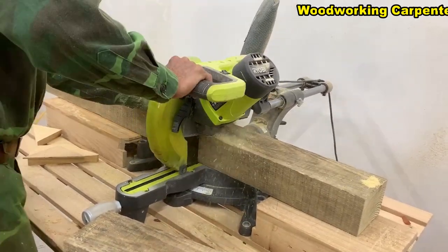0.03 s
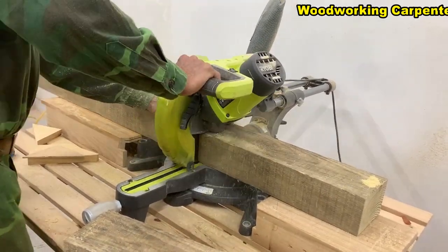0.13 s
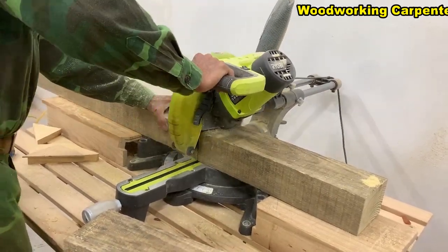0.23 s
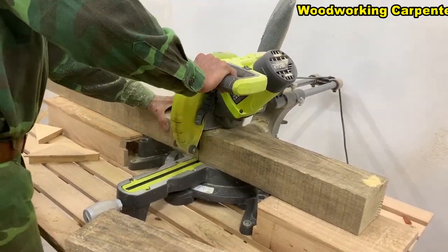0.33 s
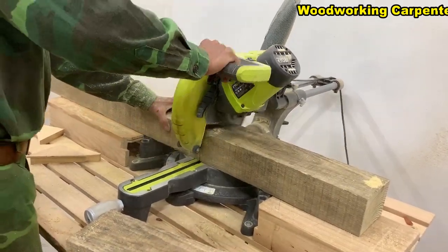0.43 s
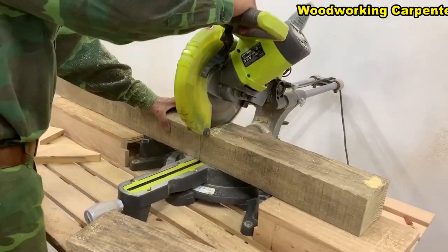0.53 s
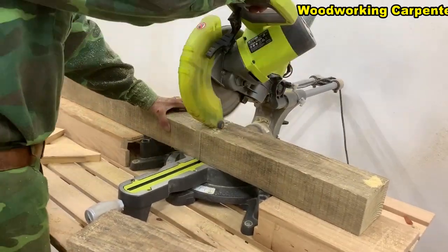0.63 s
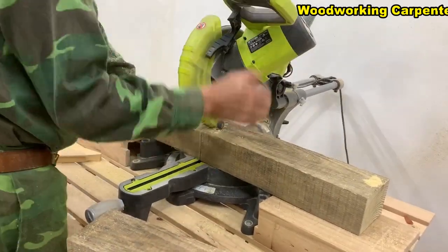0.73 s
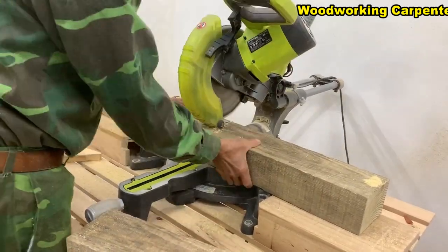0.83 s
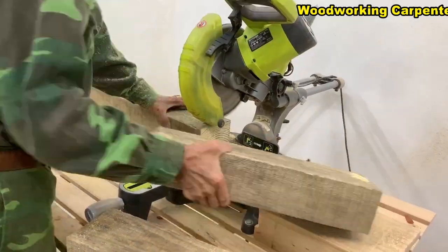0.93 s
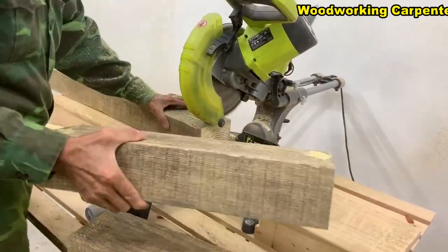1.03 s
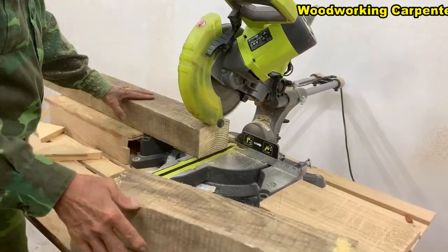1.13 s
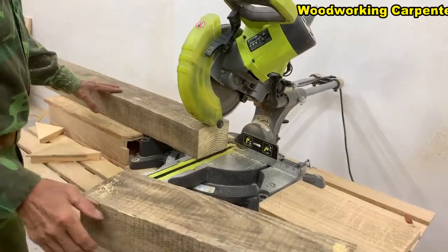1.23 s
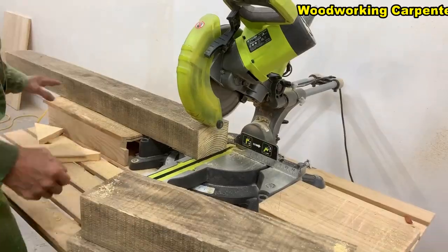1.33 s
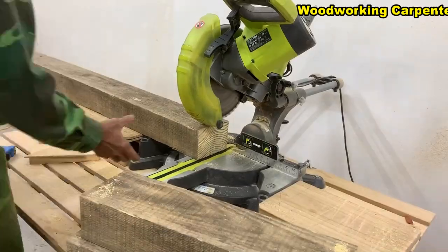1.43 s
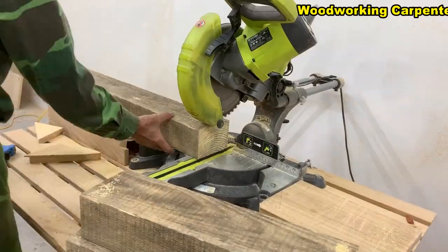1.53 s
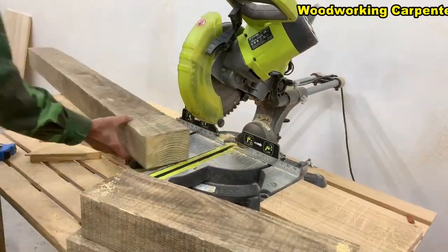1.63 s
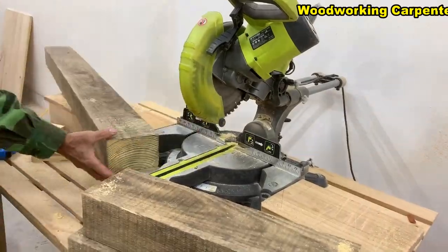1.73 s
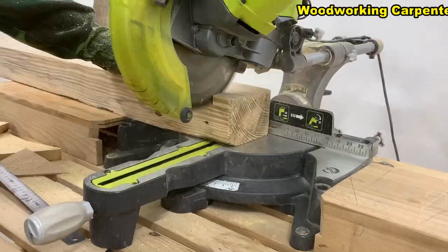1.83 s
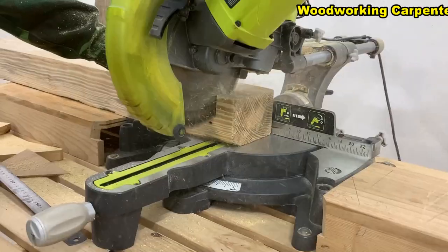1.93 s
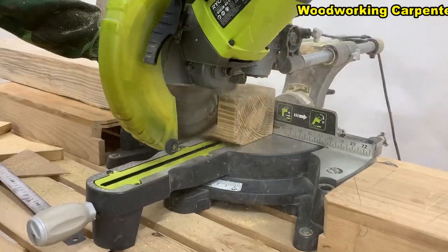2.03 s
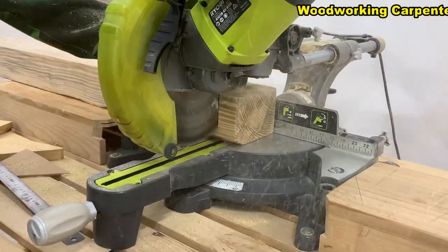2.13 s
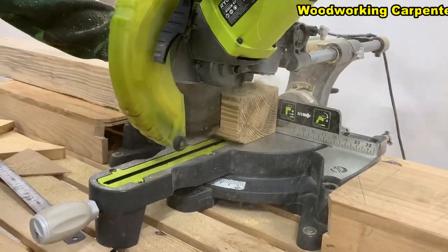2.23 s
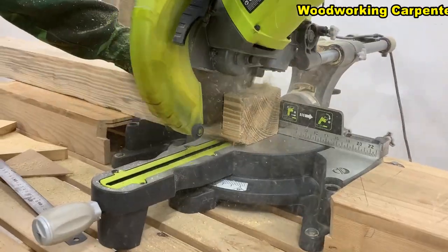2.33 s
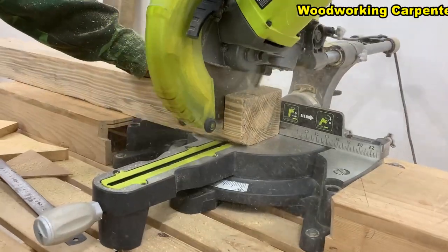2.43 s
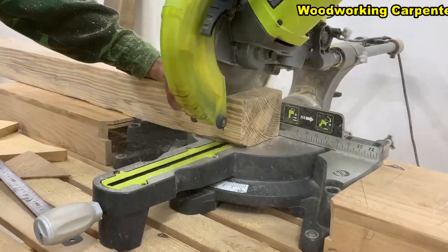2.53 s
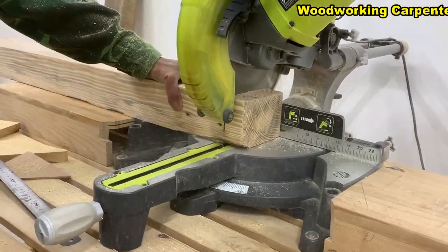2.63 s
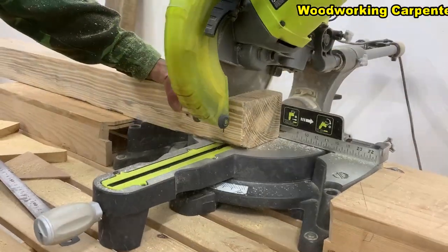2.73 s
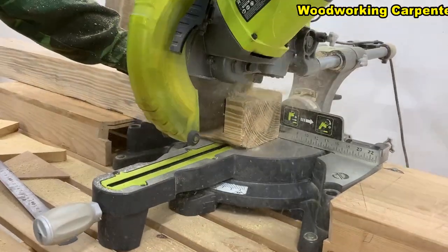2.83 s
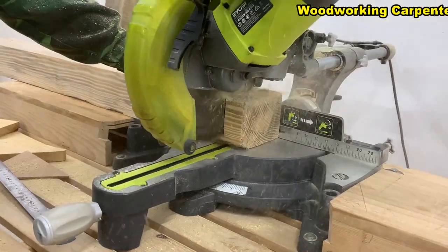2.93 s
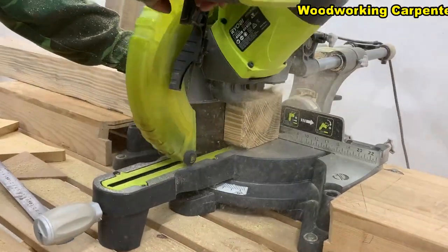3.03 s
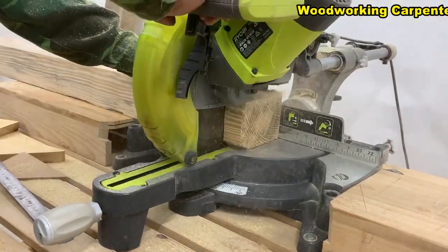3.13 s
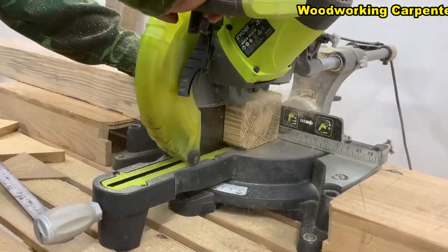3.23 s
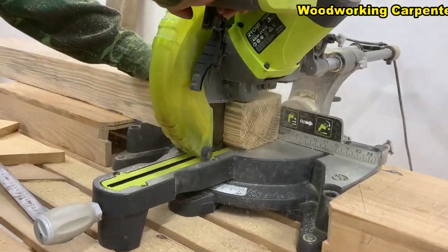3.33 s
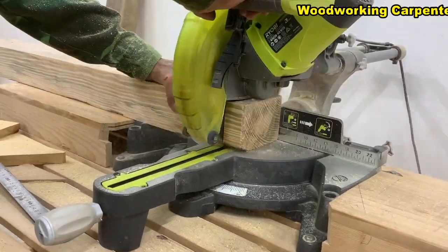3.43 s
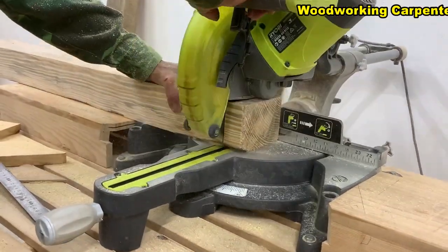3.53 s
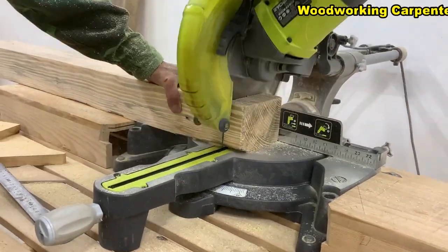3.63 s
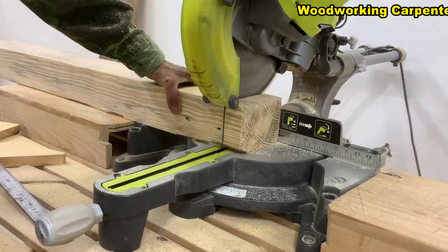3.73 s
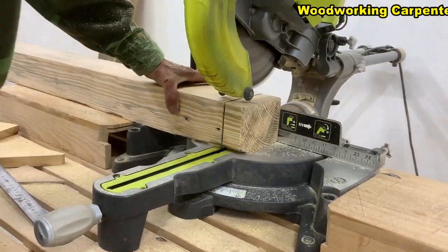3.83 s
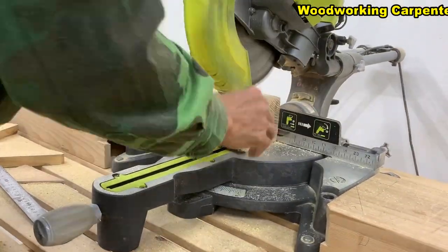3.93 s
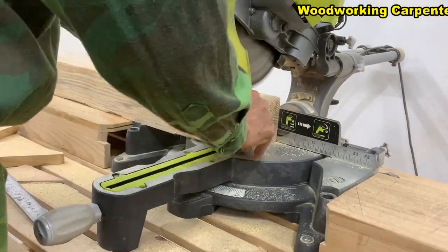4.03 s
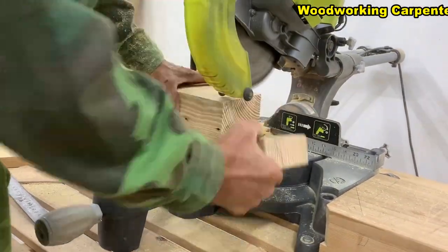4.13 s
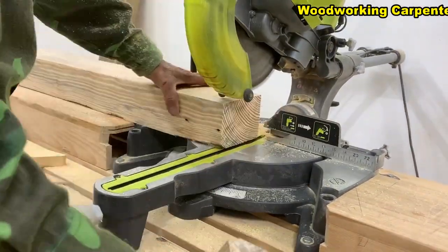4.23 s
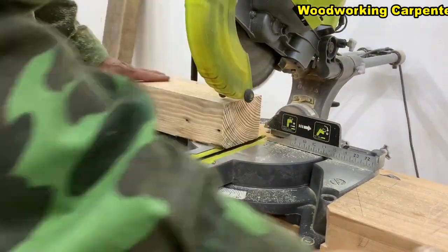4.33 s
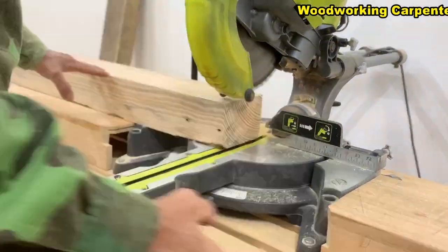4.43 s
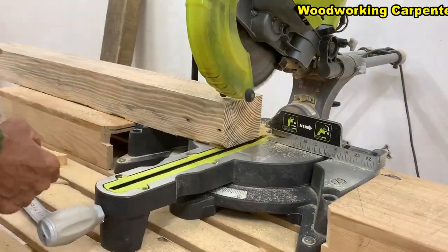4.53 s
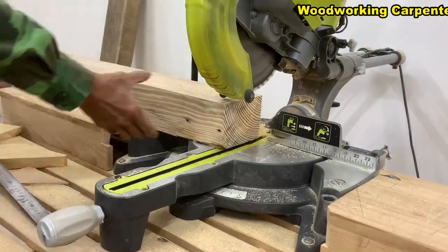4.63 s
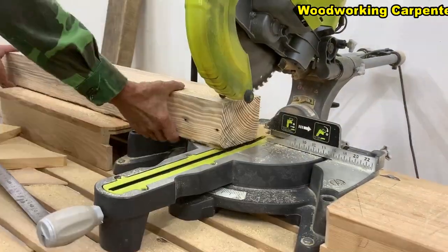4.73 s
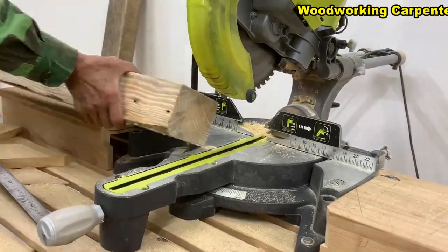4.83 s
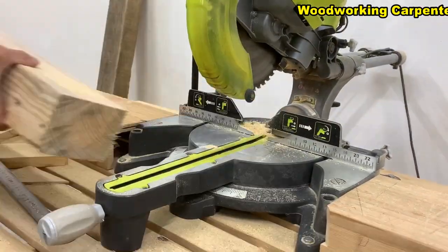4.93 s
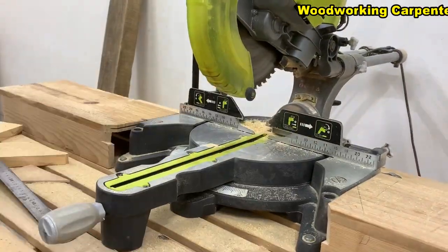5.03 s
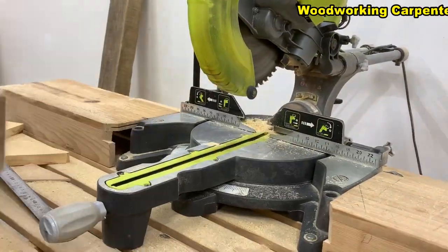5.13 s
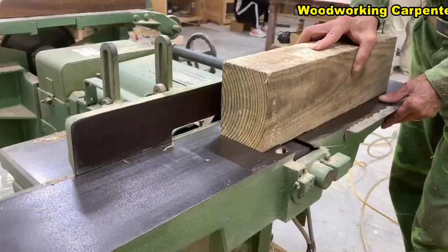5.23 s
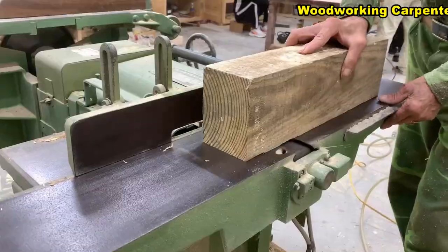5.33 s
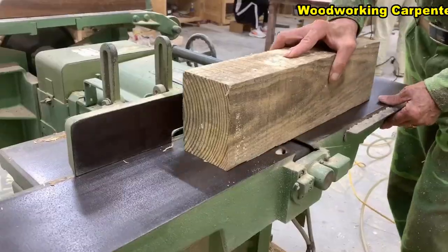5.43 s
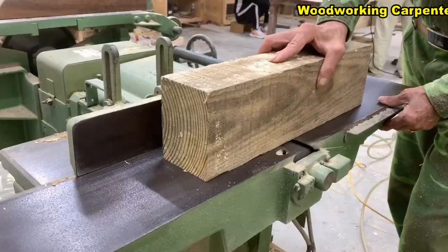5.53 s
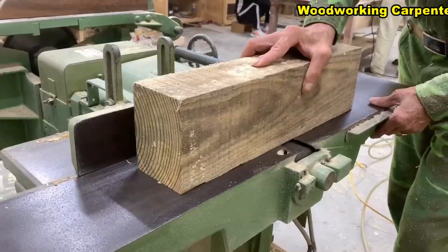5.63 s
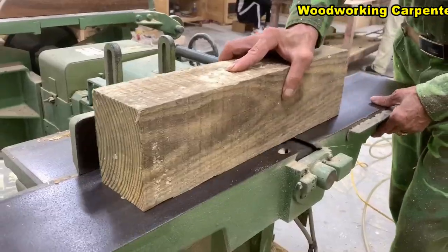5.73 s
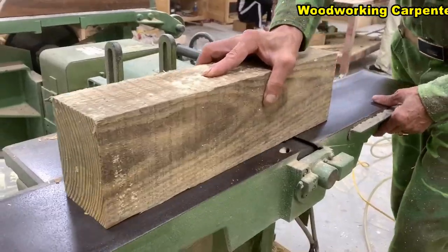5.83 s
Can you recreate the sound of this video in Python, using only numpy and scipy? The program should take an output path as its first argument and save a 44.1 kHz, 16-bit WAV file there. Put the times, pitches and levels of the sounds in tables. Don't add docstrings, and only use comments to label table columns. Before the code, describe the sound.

Two harsh power-saw cuts with falling whines and ringing blade, a few wooden knocks, then close buzzing planing in a humming workshop.

```python
import sys
import numpy as np
from scipy import signal
from scipy.io import wavfile
from scipy.ndimage import uniform_filter1d

SR = 44100
rng = np.random.default_rng(int(sys.argv[2]) if len(sys.argv) > 2 else 0)


def volts_from_db(level):
    exponent = np.asarray(level, float) / 20
    return 10 ** exponent


def persist_wave(psi):
    counts = np.round(np.clip(psi, -1, 1) * 32767).astype(np.int16)
    wavfile.write(sys.argv[1], SR, np.atleast_2d(counts).T)


N = 259749

# t/s, sound out and sound in by turns
SCENE_CHANGES = [
    1.8515,
    1.863,
    5.2365,
    5.248,
]
STOPS = [
    .68,
    3.85,
]
# trigger let go t/s, speed starts to fall t/s, brake time constant/s, top level/dB, rumble level/dB re teeth
CUTS = [
    (.53, .502, .122, 1, -30.5),
    (3.53, 3.658, .13, 1.5, -30.5),
]


def curve(table, column, t):
    rows = np.array(table, float)
    return np.interp(t, rows[:, 0], rows[:, column])


def on_log(table, hz):
    rows = np.array(table, float)
    return np.interp(np.log(hz), np.log(rows[:, 0]), rows[:, 1])


def walk(rate, n):
    hold = int(SR / rate)
    steps = np.repeat(rng.standard_normal(n // hold + 1), hold)
    return 1.48 * uniform_filter1d(uniform_filter1d(steps, hold), hold)[:n]


def span(t0, t1):
    part = slice(int(t0 * SR), min(int(t1 * SR), N))
    return part, np.arange(part.start, part.stop) / SR


def band(x, lo_hz, hi_hz, order=2):
    return signal.sosfilt(signal.butter(order, [lo_hz, hi_hz], "band", fs=SR, output="sos"), x)


def lean(hz):
    # f/Hz, left minus right/dB
    balance = [(60, -2.5), (200, -4), (400, -3.5), (700, -2.7), (1200, -4), (2400, -3), (4400, -1.3),
               (8000, -1.3), (13000, -4)]
    return volts_from_db(on_log(balance, hz) / 2 * np.array([[1.], [-1.]]))


def band_db(colour, lo, hi):
    hz = np.linspace(lo, hi, num=200)
    return 10 * np.log10(np.mean(volts_from_db(on_log(colour, hz)) ** 2) * (hi - lo))


def hiss(n, colour, gain_db, swell_db, flicker_db, grit_db, like):
    # f/Hz, likeness 0-1
    likeness = [(60, 0), (300, 0.18), (1400, 0.18), (3100, 0.07), (6800, 0.37), (15000, 0)]
    out = np.zeros((2, n))
    swell = swell_db * walk(9.58, n) + grit_db * walk(400, n)
    white = rng.standard_normal((2, 2, n))
    for k, hz in enumerate(25 * 2 ** (np.arange(29) / 3)):
        lo, hi = hz * 2 ** (-1 / 6), hz * 2 ** (1 / 6)
        mid, side = band(white[k % 2], lo, hi)
        c = np.clip(like * on_log(likeness, hz), 0, .98)
        shared, apart = mid * np.sqrt(1 + c), side * np.sqrt(1 - c)
        pair = np.array([shared + apart, shared - apart]) / np.sqrt((1 + c) * np.mean(mid ** 2))
        db = band_db(colour, lo, hi) + gain_db(hz) + swell + flicker_db * walk(14.06, n)
        out += pair * volts_from_db(db) * lean(hz)
    return out


def stack(hz, orders, wobble_db, lag, pace=6):
    n, turn, out = len(hz), 2 * np.pi * np.cumsum(hz) / SR, 0
    for k, db in orders:
        start = rng.uniform(0, 2 * np.pi)
        apart = lag * walk(1.97, n) * np.array([[1.], [-1.]])
        wander_db = wobble_db * (k * hz.mean() / 1000) ** .3 * walk(pace, n)
        sine = np.sin(k * turn + start + apart)
        out = out + np.sqrt(2) * volts_from_db(db + wander_db) * sine * lean(k * hz.mean())
    return out


def tone(hz, flutter_db=2.05):
    shaken = hz + 30 * walk(150, len(hz)) * min(hz[0] / 5000, 1)
    return stack(shaken, [(1, 0)], wobble_db=flutter_db, lag=.2, pace=50)


def ring(x, hz, t60):
    r, w = np.exp(-np.log(1000) / (t60 * SR)), 2 * np.pi * hz / SR
    return signal.lfilter([np.sin(w)], [1, -2 * r * np.cos(w), r * r], x)


def unit(x):
    return x / np.abs(x).max()


def saw():
    # t/s, teeth level/dB
    loudness = [
        [(0, -37), (.28, -37), (.52, -38.5), (.56, -38.5), (.61, -40), (.66, -41), (.72, -48.5), (.86, -58),
         (1.04, -52)],
        [(1.863, -32.5), (1.9, -30.5), (2.9, -32), (3.53, -34.5), (3.6, -37.5), (3.72, -38), (3.83, -39.5),
         (3.96, -52.5), (4.25, -57)],
    ]
    bands = [
        (25, 200),
        (1600, 5000),
        (5000, 10500),
        (10500, 15800),
    ]
    # f/Hz, level/dB per Hz
    colour = [(25, -31.5), (120, -23.5), (250, -21.5), (420, -15.5), (700, -16), (1100, -14.5),
              (1800, -12.5), (3000, -11.5), (4600, -7), (6000, -11), (7700, -3), (10300, -8), (12500, -1.5),
              (16000, -4)]
    jolts = [0.658, 3.755]
    grabs_db = [3, 5]
    bites_db = [2.5, 5.5]
    out = np.zeros((2, N))
    centres = np.log([np.sqrt(lo * hi) for lo, hi in bands])

    def share(hz):
        held = max(hz, 150) if hz > 200 else 50
        return np.array([np.interp(np.log(held), centres, one) for one in np.eye(4)])

    for track, cut, stop, jolt, grab_db, bite_db in zip(loudness, CUTS, STOPS, jolts, grabs_db, bites_db):
        off, _, _, top_db, rumble_db = cut
        part, t = span(track[0][0], track[-1][0])
        teeth = curve(track, 1, t)
        top = teeth + top_db - bite_db * np.exp(-(t - t[0]) / .077)
        top -= 10.5 * np.clip((t - stop) / .1, 0, 1)
        rumble = teeth + rumble_db - 20.5 * np.clip((t - off) / .059, 0, 1)
        rumble += 22 * np.exp(-((t - jolt) / .011) ** 2)
        grab = grab_db * np.exp(-((t - stop + .045) / .04) ** 2)
        kerf = -38 + .58 * (teeth + 35) + grab
        levels = [rumble, kerf, teeth, top]
        moves = np.array([db - band_db(colour, lo, hi) for db, (lo, hi) in zip(levels, bands)])
        noise = hiss(len(t), colour, lambda hz: share(hz) @ moves, 0.79, 1.36, 0.91, like=1.57)
        fade = np.clip((t[-1] - t) / 0.14, 0, 1)
        out[:, part] = fade * (noise + volts_from_db(-22) * sing(noise)) * volts_from_db(-1.0)
    return out


def sing(noise):
    modes = rng.uniform(1787, 15600, size=30)
    return sum(volts_from_db(6 * walk(30, noise.shape[1])) * ring(noise, hz, .03) for hz in modes) / 30


def brake():
    # f/Hz, level/dB
    housing = [(1900, -56), (2250, -50), (2800, -38), (3900, -45), (5400, -39), (7200, -39), (8800, -46),
               (9600, -50)]
    # multiple, resonance f/Hz, width/Hz, level/dB
    flares = [(1.981, 10800, 500, -43), (2.25, 6400, 400, -39), (4.65, 6950, 900, -49)]
    lifts_db = [-1, 3.5]
    gear_hz, knee_s = 9600, .016
    out = np.zeros((2, N))
    for (_, s, tau, _, _), lift_db in zip(CUTS, lifts_db):
        part, t = span(s - .04, s + .3)
        slowing_s = (np.hypot(t - s, knee_s) + t - s) / 2
        hz = gear_hz * np.exp(-slowing_s / tau)
        audible = np.clip(hz / 200 - 8, 0, 1)
        out[:, part] += volts_from_db(on_log(housing, hz) + lift_db) * audible * tone(hz, flutter_db=1.8)
        for k, centre_hz, width, db in flares:
            flare = volts_from_db(db) * np.exp(-((k * hz - centre_hz) / width) ** 2)
            out[:, part] += flare * tone(np.minimum(k * hz, 16000))
    return out


def whistles():
    heard = (2.04, 3.55)
    # t/s, sag f/Hz, fall/s, recovery/s
    pushes = [
        (2.17, 2650, .11, .11),
        (2.38, 950, .1, .06),
        (2.66, 850, .07, .06),
        (3.2, 3300, .17, .1),
        (3.5, 2200, .1, .1),
    ]
    # t/s, level/dB, half length/s
    drumming = [(1.995, -50, 0.027), (2.144, -51, .09), (2.65, -47.5, 0.29), (3.012, -53, .08),
                (3.173, -45, 0.086), (3.5, -51, 0.16)]
    # t/s, length/s, from f/Hz, to f/Hz, level/dB
    glides = [(0, .45, 1248, 1256, -45), (.43, .06, 9650, 9250, -39), (0.527, .06, 9750, 9720, -39),
              (1.867, 0.083, 9700, 9700, -37), (2.346, 0.19, 8600, 8000, -37),
              (2.875, .08, 9300, 9100, -37), (3.762, 0.051, 6000, 5730, -38),
              (3.784, .05, 4300, 3700, -37.5), (3.834, .22, 12200, 12600, -48),
              (3.95, 0.23, 4800, 3670, -54), (4.92, .04, 4500, 4450, -48), (4.926, .03, 4900, 4770, -48),
              (5.25, 0.54, 1511, 1511, -37.5), (5.722, 0.13, 600, 546, -46.5)]
    out = np.zeros((2, N))
    tooth_hz, lost_hz = 15750, 12900
    part, t = span(*heard)
    hz = tooth_hz
    for s, sag, fall, recovery in pushes:
        hz = hz - sag * np.exp(-((t - s) / np.where(t < s, fall, recovery)) ** 2)
    audible = np.clip(np.minimum((hz - lost_hz) / 200, (tooth_hz - hz) / 500), 0, 1)
    out[:, part] = volts_from_db(-40 + walk(8, len(t))) * audible * tone(hz, flutter_db=1.2)

    part, t = span(SCENE_CHANGES[1], STOPS[1])
    swell = sum(volts_from_db(db - 20 * ((t - s) / half) ** 2) for s, db, half in drumming)
    out[:, part] += swell * tone(np.full(len(t), 391.5))

    rise, fade_db = .16, 6.5
    for s, length, from_hz, to_hz, db in glides:
        part, t = span(s, s + length)
        u = (t - s) / length
        attack = u / rise if s else 1
        ends = np.clip(np.minimum(attack, (1 - u) / rise), 0, 1)
        out[:, part] += ends * volts_from_db(db - fade_db * u) * tone(from_hz + (to_hz - from_hz) * u)
    return out


def blade():
    # f/Hz, first stop level/dB, second stop level/dB, t60/s
    modes = [(3606, -54.5, -54.5, 3), (4610, -57, -54, 1.1), (6050, -51, -55, 0.6), (7900, -56, -50.5, 1.1),
             (14900, -55, -51, .5), (2470, -52, -62, 1.65), (7500, -53, -54, .6), (11000, -61, -50, 0.43),
             (12700, -57, -52, 0.78), (13400, -58, -56, .4)]
    out = np.zeros((2, N))
    for k, s in enumerate(STOPS):
        part, t = span(s - .03, s + 0.98)
        for hz, *db, t60 in modes:
            fall = np.clip((t - t[0]) / 0.01, 0, 1) * volts_from_db(db[k] - 60 * (t - s) / t60)
            shaken = hz + 70 * walk(120, len(t))
            out[:, part] += fall * stack(shaken, [(1, 0)], wobble_db=2.4, lag=.5, pace=110)
    return out


def knocks():
    # t/s, peak level/dB, thud level/dB, tail level/dB, crack centre f/Hz
    blows = [(1.1985, -2, -14.5, -19.5, 5200), (1.228, -29, 4, -1, 4200), (1.2554, -35, -4, 2.5, 3700),
             (4.437, -40, -20, 6, 3700), (4.505, -26.5, -4, -16, 6900), (4.5085, -25, 2, -14, 7500),
             (4.5375, -23, -11, -10, 6200), (4.548, -31.5, -20, -12, 5500), (4.686, -40, -20, -18, 4800),
             (4.7757, -35.5, 0, -16, 3800), (4.7876, -28, -20, -20, 4140), (4.8815, -30, -16, -16, 7000),
             (4.8845, -18, -18, -18, 6000), (4.8875, -26, -16, -14, 7500), (4.9084, -32, -20, -14, 4800),
             (4.9235, -31, -20, 2, 2100), (4.927, -31, -25, -4, 4700)]
    # f/Hz, width/Hz, level/dB
    high_modes = [(4140, 170, -3), (5730, 400, -8), (6500, 400, 0), (8300, 380, 5), (2590, 220, -16.5)]
    # f/Hz, width/Hz, level/dB
    beam_modes = [(318, 84, -30), (480, 43, -12.5), (740, 70, -11), (1062, 59, 1), (1380, 130, -2.5)]
    out, t = np.zeros((2, N)), np.arange(int(.3 * SR)) / SR
    tick = np.exp(-((t - .0006) / .00003) ** 2)
    for k, (s, peak_db, thud_db, tail_db, centre_hz) in enumerate(blows):
        grit = rng.standard_normal((3, len(t)))
        burst = grit[0] * t / .0007 * np.exp(-t / .0007)
        lo_hz = centre_hz / 1.4 - centre_hz ** 2 / 40000
        hi_hz = centre_hz * 1.1 + centre_hz ** 3 / 6e7
        crack = unit(band(burst, lo_hz, hi_hz))
        if k == 0:
            rung = sum(volts_from_db(db) * ring(tick, hz, 2.2 / width) / np.sin(2 * np.pi * hz / SR)
                       for hz, width, db in high_modes)
            crack = unit(band(unit(rung + 1.25 * crack), 2400, 13000, order=3))
        tail = band(grit[1:], lo_hz, hi_hz) * volts_from_db(-60 * t / .11) * (1 - np.exp(-t / 0.00067))
        contact = tick + volts_from_db(-24) * grit[1:] * volts_from_db(-60 * t / .1)
        thud = sum(volts_from_db(db) * unit(ring(contact, hz, 2.6 / width)) for hz, width, db in beam_modes)
        hit = crack + volts_from_db(tail_db) * tail + volts_from_db(thud_db) * unit(thud)
        hit = signal.sosfilt(signal.butter(4, 260, "high", fs=SR, output="sos"), hit)
        out[:, int(s * SR):int(s * SR) + len(t)] += volts_from_db(peak_db) * lean(centre_hz) * hit
    return out


def jointer():
    # t/s, chips level/dB
    planing = [(5.25, -30), (5.252, -33), (5.742, -32), (5.89, -33)]
    knife_orders = [-18.5, -2, -22, -13.5, -8, -1, -8, -0.5, -10.5, -12, -10, -13, -12, -12, -17, -7.5, -21,
                    -9.5, -13, -8, -8.5, -16, -18, -13, -18, -19, -12, -11.5, -14, -13, -17, -17, -17, -6,
                    -10, -19, -10, -6.5, -12, -7, -13, -11, -16, -11, -15]
    # f/Hz, level/dB per Hz
    colour = [(25, -65), (130, -55), (250, -28), (450, -20), (900, -16), (1500, -9), (2600, -6),
              (3400, -10), (5200, -7), (6000, -13), (8000, -12), (10500, -16), (13000, -14.5), (16000, -15)]
    knife_hz, knives_db, chips_db = 348.25, -6, -4
    out = np.zeros((2, N))
    part, t = span(SCENE_CHANGES[3], N / SR)
    chips_gain = chips_db - band_db(colour, 3700, 9300)
    chips = hiss(len(t), colour, lambda hz: chips_gain, 0.97, 0.95, 0.91, like=0.68)
    beat = 1 + 0.15 * np.cos(2 * np.pi * knife_hz * t)
    knives = stack(np.full(len(t), knife_hz), enumerate(knife_orders, 1), wobble_db=1.9, lag=.3, pace=24)
    engaged = volts_from_db(knives_db - 5 * np.exp(-((t - t[0]) / .2) ** 2))
    out[:, part] = volts_from_db(curve(planing, 1, t)) * (beat * chips + engaged * knives)
    return out


def shop():
    # t/s, fourth order f/Hz, level/dB
    idle = [
        [(0, 1000, -51), (.49, 1002, -51.5), (.6, 1004, -43.5), (1.85, 1005, -39)],
        [(1.87, 1004, -45), (2.1, 1006, -45), (3.35, 1006.5, -45.5), (4.03, 1007, -42.5), (5.23, 1006.5, -39)],
        [(5.25, 1006.5, -40.5), (5.76, 1007, -37.5), (5.89, 1007, -37.5)],
    ]
    # multiple, level/dB
    idle_orders = [
        [(1, -14), (2, 0.5), (3, -13.5), (4, 7), (5, -37), (6, -11), (7, -45), (8, -63), (9, -24), (10, -25),
         (11, -46), (12, -22), (13, -53), (14, -17)],
        [(1, -17), (2, -5), (3, -24), (4, 2), (5, -22), (6, -14.0), (7, -25), (8, -24.5), (9, -42), (10, -8.5),
         (11, -38), (12, -20.5), (13, -52), (14, -23.5)] + [(16, -36), (18, -27), (20, -24.0)],
        [(1, -12), (2, -1.5), (3, -8), (4, 4.5), (6, 4), (8, -10), (10, -7), (12, -20)],
    ]
    fan_db = [-22.5, -19, -23]
    # f/Hz, level/dB per Hz
    colour = [(25, -80), (100, -85), (190, -40), (260, -56), (350, -36), (700, -32), (1150, -29.5),
              (1600, -36), (2000, -34.5), (2700, -41.5), (3600, -37.5), (5200, -40), (7500, -36),
              (10500, -42), (16000, -38.5)]
    fan_order = 40
    air_gain = -14.5 - band_db(colour, 2150, 13000)
    out, edges = np.zeros((2, N)), [0, SCENE_CHANGES[1], SCENE_CHANGES[3], N / SR]
    for k, (track, orders) in enumerate(zip(idle, idle_orders)):
        part, t = span(edges[k], edges[k + 1])
        fourth = dict(orders)[4]
        tones = list(orders) + [(fan_order, fourth + fan_db[k])]
        hum = stack(curve(track, 1, t) / 4, tones, wobble_db=.8, lag=.3)
        air = hiss(len(t), colour, lambda hz: air_gain, 0.17, 1.5, 0.95, like=0.12)
        out[:, part] = volts_from_db(curve(track, 2, t)) * (hum * volts_from_db(-fourth) + air)
    return out


def scene():
    t = np.arange(N) / SR
    gaps = [(t > a) & (t < b) for a, b in zip(SCENE_CHANGES[::2], SCENE_CHANGES[1::2])]
    cut = uniform_filter1d(np.where(gaps[0], volts_from_db(-24), 1.), size=20)
    hum = shop() * uniform_filter1d(np.where(gaps[1], volts_from_db(-20), 1.), size=20)
    air = gaps[1] * volts_from_db(-44.0) * band(rng.standard_normal((2, N)), 1500, 14000)
    return cut * (saw() + brake() + whistles() + blade() + knocks() + hum) + jointer() + air


def roll_off(x):
    return signal.sosfilt(signal.butter(12, 16680, fs=SR, output="sos"), x)


def record(dry):
    mix = signal.sosfilt(signal.ellip(10, .2, 60, 15680, fs=SR, output="sos"), dry)
    return roll_off(mix)


dry = scene()
out = record(dry)
persist_wave(out)
```